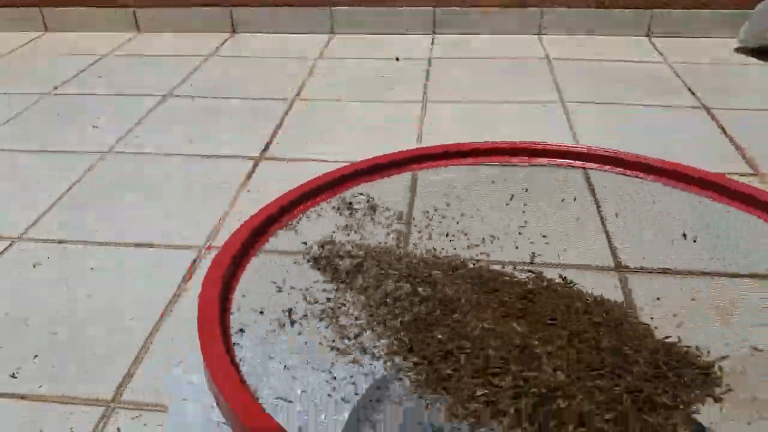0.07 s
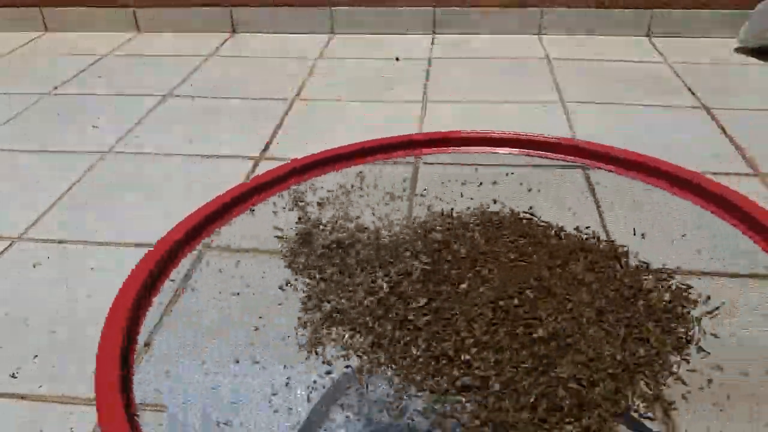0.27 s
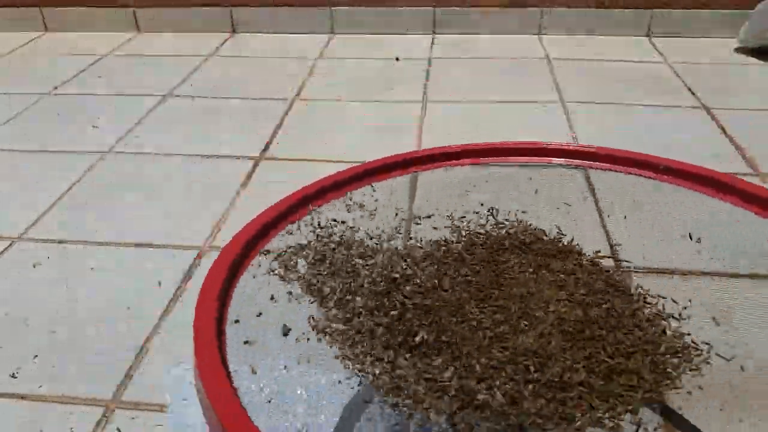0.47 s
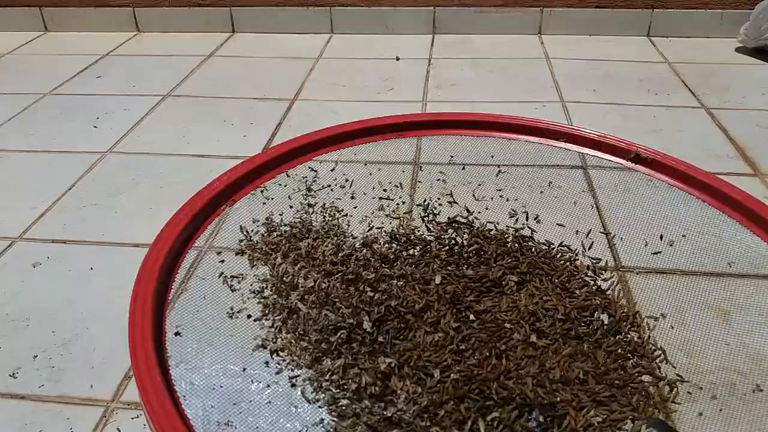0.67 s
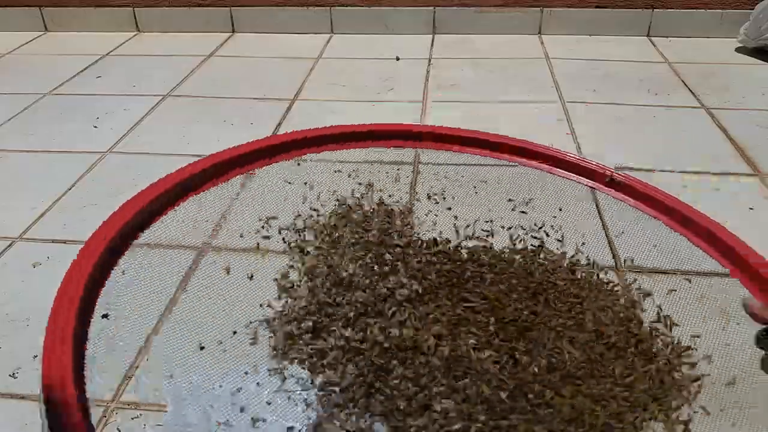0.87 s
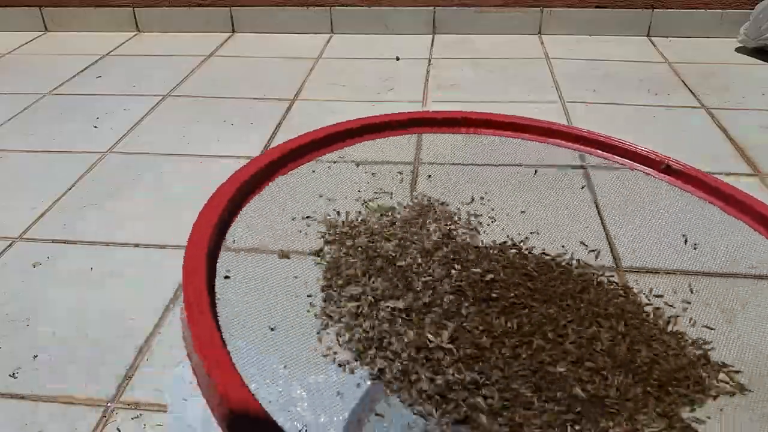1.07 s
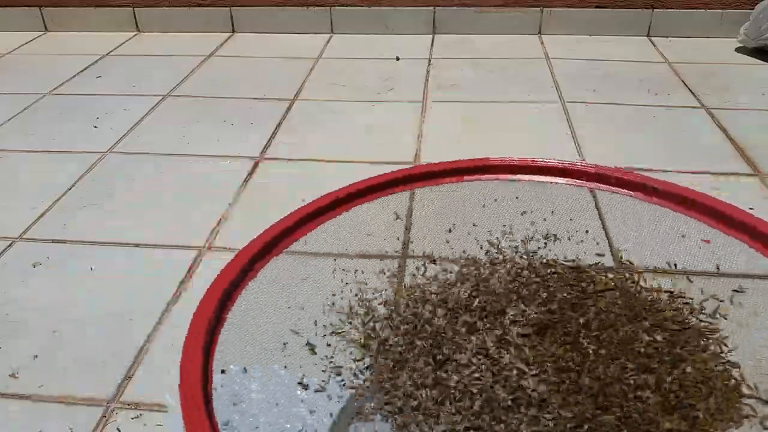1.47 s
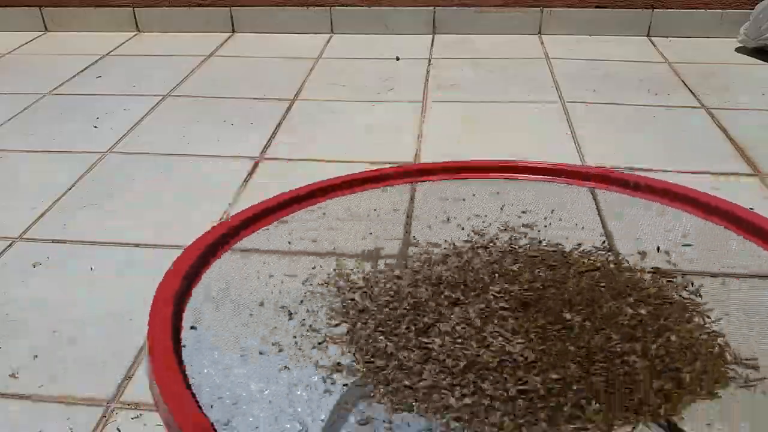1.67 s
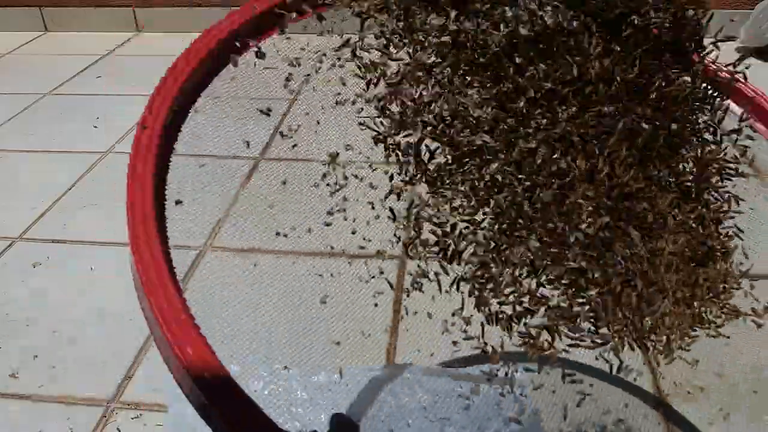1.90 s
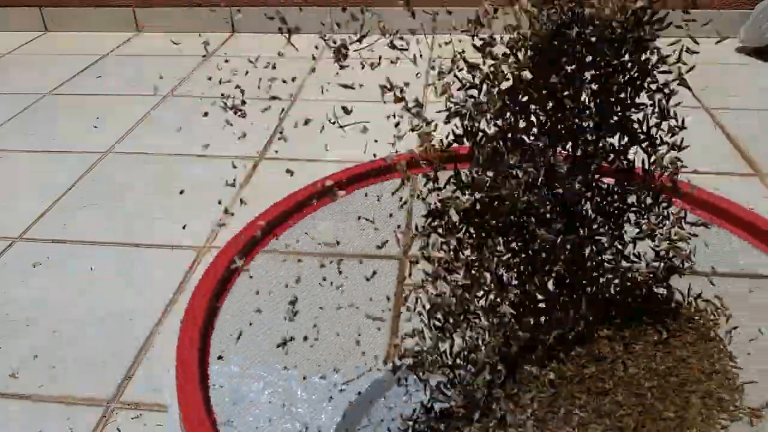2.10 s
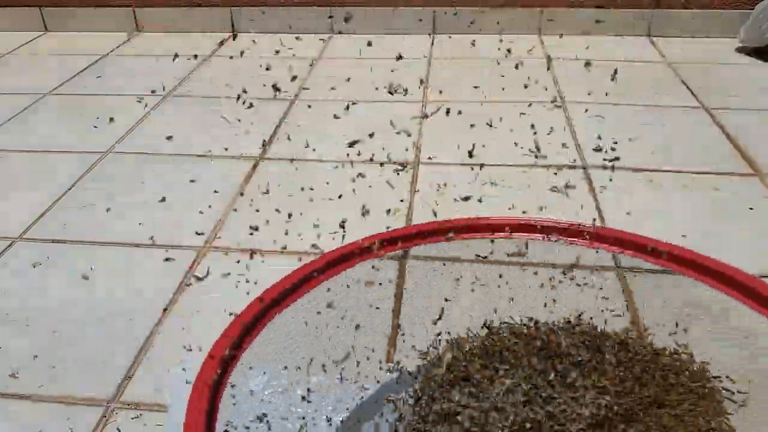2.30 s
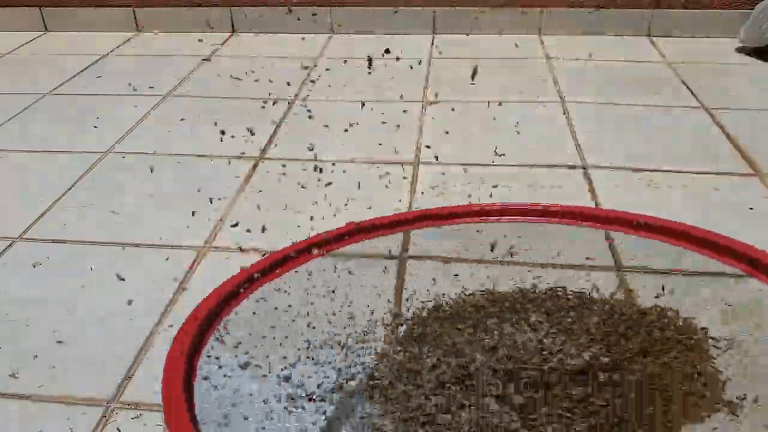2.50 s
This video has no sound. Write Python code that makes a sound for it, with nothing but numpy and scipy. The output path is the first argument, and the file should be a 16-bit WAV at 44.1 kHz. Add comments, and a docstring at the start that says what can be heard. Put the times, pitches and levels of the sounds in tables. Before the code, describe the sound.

Quick rustling strokes of dry seeds in a mesh sieve, ending with one toss and landing.

```python
"""A tiled yard: dry seeds shaken in a round mesh sieve, about six strokes a second, then tossed once.
Each surge is thousands of tiny husk contacts. The heap settles, flies and rains back down
while strays tick on mesh and tiles. The plastic rim knocks lightly.
Outdoor rumble and a faint low hum lie behind. Mono."""
import sys
import numpy as np
from scipy import signal
from scipy.fft import rfft, irfft, next_fast_len
from scipy.io import wavfile

SR = 44100
rng = np.random.default_rng(int(sys.argv[2]) if len(sys.argv) > 2 else 0)


def store_wav(level_fs):
    """Save 16-bit WAV to argv[1]."""
    pcm = np.round(np.clip(np.atleast_2d(level_fs), -1, 1) * 32767)
    wavfile.write(sys.argv[1], SR, pcm.T.astype(np.int16))


N = 116865
TIME = np.arange(N) / SR


def from_db(db):
    """Decibels to gain."""
    return 10 ** (np.asarray(db) / 20)


def unit_rms(x):
    """Scale to rms 1."""
    return x / np.sqrt(np.mean(x ** 2) + 1e-20)


def coloured(x, spectrum):
    """Minimum-phase filter from (freq_hz, gain_db) rows; output rms 1."""
    size = 2 * next_fast_len(N)
    freq_hz, gain_db = np.transpose(spectrum)
    grid_hz = np.maximum(np.arange(size // 2 + 1) * SR / size, 1)
    gain = from_db(np.interp(np.log(grid_hz), np.log(freq_hz), gain_db))
    cepstrum = irfft(np.log(gain))
    cepstrum[1:size // 2] *= 2
    cepstrum[size // 2 + 1:] = 0
    return unit_rms(irfft(rfft(x, size) * np.exp(rfft(cepstrum)))[:N])


def resonance(x, centre_hz, width_hz):
    """Band-pass, peak gain 1."""
    r = np.exp(-np.pi * width_hz / SR)
    feedback = [1, -2 * r * np.cos(2 * np.pi * centre_hz / SR), r * r]
    return signal.lfilter(np.array([1, 0, -1]) * (1 - r * r) / 2, feedback, x + 1e-18)


def drift(rate_hz):
    """Slow random wander, rms 1."""
    r = np.exp(-2 * np.pi * rate_hz / SR)
    return unit_rms(signal.lfilter([1], [1, -2 * r, r * r], rng.standard_normal(2 * N))[N:])


def contacts(per_s, spread_db=0):
    """Random uneven clicks, at most one a sample; same mean power at any rate."""
    chance = np.clip(per_s / SR, 1e-4, 1)
    sizes = from_db(spread_db * np.minimum(rng.exponential(1, N), 4)) * rng.standard_normal(N)
    return sizes * (rng.random(N) < chance) / np.sqrt(chance)


def decay(start_s, t60_s):
    """Step to 1, then exponential fall."""
    return (TIME >= start_s) * from_db(-60 * np.clip((TIME - start_s) / t60_s, 0, 4))


# Outdoor noise spectrum: freq_hz, gain_db
AIR_SPECTRUM = [(25, -41), (35, -26), (45, -13), (65, 1), (110, -2), (170, -6), (280, -6.5), (400, -11),
                (560, -6), (900, -15.5), (1600, -19), (4000, -24), (9000, -46), (15000, -41)]


def air(level_db=-51):
    """Steady outdoor rumble."""
    return from_db(level_db) * coloured(rng.standard_normal(N), AIR_SPECTRUM)


# Hum tones: pitch_hz, level_db
HUM_TONES = [(91, -59.5), (120, -67.5), (159, -65), (206, -61)]


def hum(wander_hz=1.26, waver_db=4):
    """Low tones, each wavering in pitch and level."""
    out = 0
    for pitch_hz, level_db in HUM_TONES:
        phase = 2 * np.pi * np.cumsum(pitch_hz + wander_hz * drift(rate_hz=4.56)) / SR
        out += np.sqrt(2) * from_db(level_db + waver_db * drift(rate_hz=6.4)) * np.sin(phase)
    return out


# Loose-seed envelope: time_s, level_db
STRAY_LEVELS = [(0, -47.5), (1.5, -56.5), (1.72, -51), (1.82, -61), (1.89, -63), (1.95, -85), (2.3, -56),
                (2.42, -48), (2.5, -53.5), (2.57, -55.5), (2.65, -51)]
# Single-seed spectrum: freq_hz, gain_db
STRAY_SPECTRUM = [(400, -14), (800, -8.5), (1700, 0.5), (4000, 1.5), (6000, -8), (7400, -4), (9500, -12.5),
                  (15500, -15)]


def strays():
    """Loose seeds hop singly in a thin patter."""
    envelope = from_db(np.interp(TIME, *np.transpose(STRAY_LEVELS)))
    return envelope * coloured(contacts(per_s=2500), STRAY_SPECTRUM)


# Surges over the mesh; the last three are the tossed heap landing:
# crest_s, level_db, rise_s, fall_s, body_db, treble_db, focus_hz, focus_db
HEAP_SURGES = [(0.132, -30, 0.058, 0.025, -1.5, -0.5, 4100, 2.5),
               (0.296, -20.5, 0.048, 0.054, 0.5, 1.2, 4150, 2), (0.452, -20, 0.049, 0.041, 0.5, 1, 4030, 3),
               (0.602, -21, 0.049, .035, .3, .5, 4100, 1), (.739, -20, 0.046, 0.065, -1.5, -.5, 3150, 3),
               (.908, -20.5, 0.054, 0.048, 0.8, 1, 3170, 1.5),
               (1.072, -22.5, 0.061, 0.034, 0.6, 1, 2700, -0.5),
               (1.236, -19, 0.061, 0.041, 2, 1, 2780, 1.5), (1.389, -23, .065, 0.041, 0.9, 1.2, 3500, 0.5),
               (1.515, -39.5, 0.033, 0.026, 0.5, -2, 3400, 2.5),
               (1.836, -45, 0.019, 0.019, 2.5, 1, 3000, 3), (2.102, -21, 0.06, 0.1, 0.3, 0.1, 3500, 2),
               (2.246, -24, 0.055, 0.063, 0.5, 0.4, 2980, 1.5), (2.37, -36.5, .04, 0.064, 0, 2, 3620, 2)]
# Husk-on-husk and husk-on-mesh spectrum: freq_hz, gain_db
HUSK_SPECTRUM = [(300, -37.5), (600, -25.5), (1150, -19.5), (1550, -9.5), (2300, -5), (3100, -0.85),
                 (4100, -2), (5000, -7), (6200, -12), (7400, -7), (8300, -12.5), (9500, -17),
                 (12500, -17.5), (15500, -18)]


def heap_rustle(gain_db=-3, settle_db=-5, settle_t60_s=0.5):
    """More motion gives denser, louder husk contacts; each surge has its own tint, then settles."""
    surges = []
    for crest_s, level_db, rise_s, fall_s, *_ in HEAP_SURGES:
        distance = np.abs(TIME - crest_s) / np.where(TIME < crest_s, rise_s, fall_s)
        surges.append(from_db(level_db) ** 2 * np.exp(-distance ** 2.59))  # flat-topped bell
    power = sum(surges) + 1e-12
    pole = from_db(-60 / (settle_t60_s * SR)) ** 2
    motion = power + from_db(settle_db) ** 2 * signal.lfilter([1 - pole], [1, -pole], power)
    contacts_per_s = 8000 + 60000 * motion / from_db(-20) ** 2
    grains = coloured(contacts(contacts_per_s, spread_db=1.1), HUSK_SPECTRUM)
    body = resonance(grains, centre_hz=1730, width_hz=1730)
    treble = resonance(grains, centre_hz=11000, width_hz=5500)
    out = grains
    for surge, (*_, body_db, treble_db, focus_hz, focus_db) in zip(surges, HEAP_SURGES):
        focus = resonance(grains, focus_hz, width_hz=290)
        bands = [(body, body_db), (treble, treble_db), (focus, focus_db)]
        tint = sum((from_db(boost_db) - 1) * band for band, boost_db in bands)
        out = out + surge / power * tint
    return from_db(gain_db) * np.sqrt(motion) * out


# Knocks on the rim: start_s, force_db
RIM_KNOCKS = [(.229, -31.5), (1.045, -29.5), (1.137, -33), (1.337, -27), (1.618, -31), (1.651, -33),
              (1.724, -38), (2.258, -28), (2.4431, -17.5), (2.637, -26)]
# Plastic rim modes: pitch_hz, gain_db, t60_s
RIM_MODES = [(623, -8.5, 0.027), (774, -9.5, 0.011), (1020, -7.5, .008), (1180, -10, 0.0042),
             (1800, -15, 0.017), (2450, -13, .005), (4530, -14, 0.0046)]


def rim_knocks(shiver_db=-23, shiver_t60_s=0.055, radiated_hz=(500, 5000)):
    """Each knock and the frame's brief shiver ring the thin rim's damped modes."""
    force, out = np.zeros(N), 0
    for start_s, force_db in RIM_KNOCKS:
        force[int(start_s * SR)] += from_db(force_db)
        shiver = decay(start_s, shiver_t60_s) * rng.normal(0, 0.5, N)
        force += from_db(force_db + shiver_db) * shiver
    for pitch_hz, gain_db, t60_s in RIM_MODES:
        r = from_db(-60 / (t60_s * SR))
        r_cos = r * np.cos(2 * np.pi * pitch_hz / SR)
        out -= from_db(gain_db) * signal.lfilter([1, -r_cos], [1, -2 * r_cos, r * r], force + 1e-18)
    return signal.sosfilt(signal.butter(2, radiated_hz, "band", fs=SR, output="sos"), out)


# Hard seed landings: start_s, level_db, ring_hz, crack_db
SEED_TICKS = [(1.542, -27.5, 1940, -28), (1.652, -43, 3580, -16), (1.683, -42.5, 2550, -22),
              (1.934, -44.5, 2000, -28), (1.961, -57, 3700, -28), (2.347, -24, 3200, -25),
              (2.548, -43, 3500, -3), (2.592, -46.5, 7360, 0), (2.598, -43, 2700, -12),
              (2.612, -45, 2700, 3), (2.619, -43, 3600, -1)]


def seed_ticks(t60_s=0.021):
    """A seed hits hard: short crack, broad ring."""
    out = 0
    for start_s, level_db, ring_hz, crack_db in SEED_TICKS:
        crack = rng.standard_normal(N)
        ring = unit_rms(resonance(crack, ring_hz, width_hz=0.21 * ring_hz))
        out += from_db(level_db) * decay(start_s, t60_s) * (ring + from_db(crack_db) * crack)
    return out


# Floor and wall reflections: delay_s, gain_db
YARD_ECHOES = [(.0031, -20), (0.0133, -14), (0.0171, -15)]


def yard(x):
    """Direct sound plus near echoes."""
    return x + sum(from_db(gain_db) * np.interp(TIME - delay_s, TIME, x, left=0)
                   for delay_s, gain_db in YARD_ECHOES)


def scene():
    """All sources, same in both channels."""
    mono = heap_rustle() + yard(strays() + seed_ticks() + rim_knocks()) + air() + hum()
    return np.array([mono, mono])


def record(dry):
    """Steep treble cut."""
    cutoff_hz = 15800
    return signal.sosfilt(signal.ellip(12, 0.1, 80, cutoff_hz, fs=SR, output="sos"), dry)


dry = scene()
out = record(dry)
store_wav(out)
```